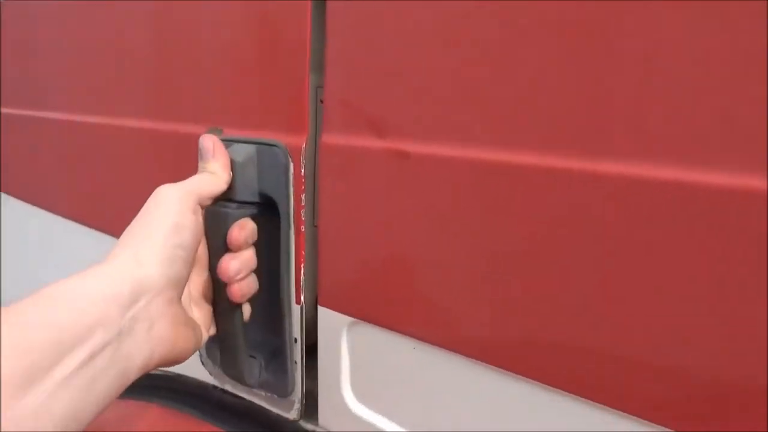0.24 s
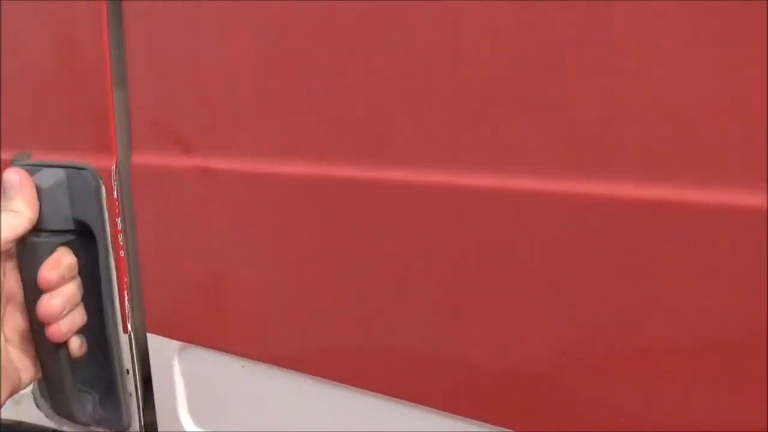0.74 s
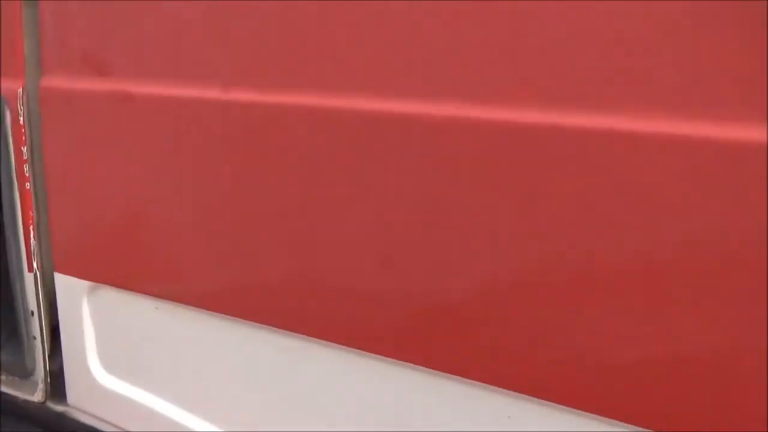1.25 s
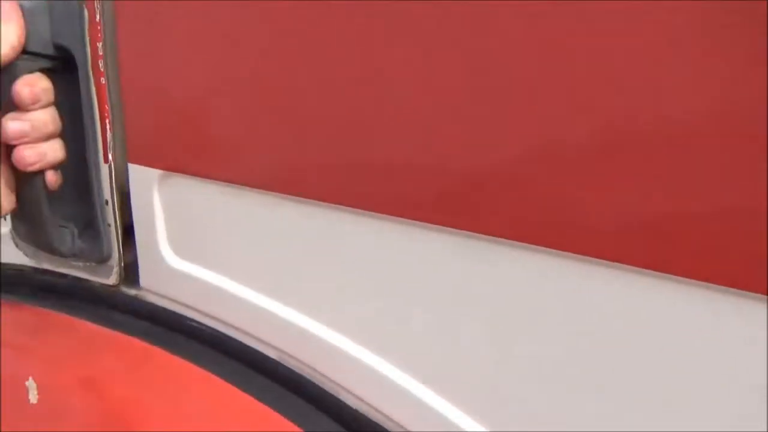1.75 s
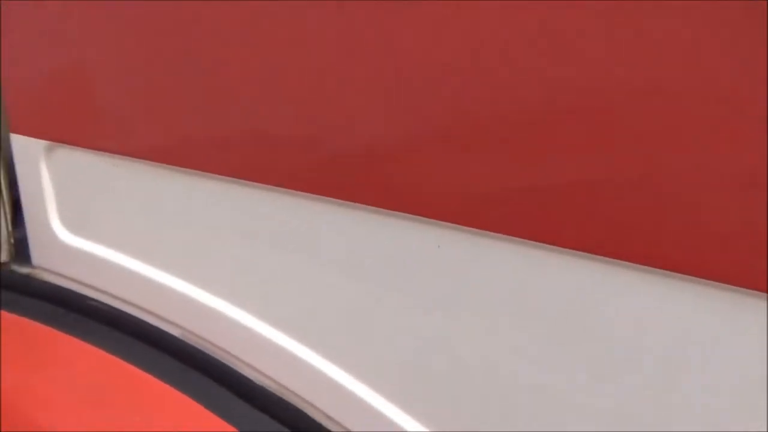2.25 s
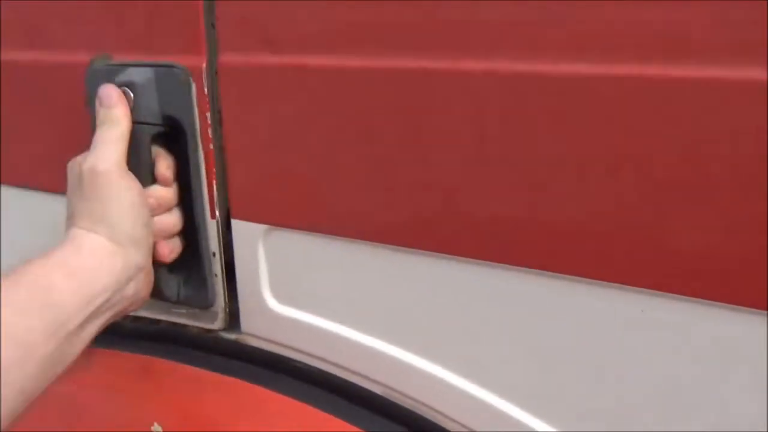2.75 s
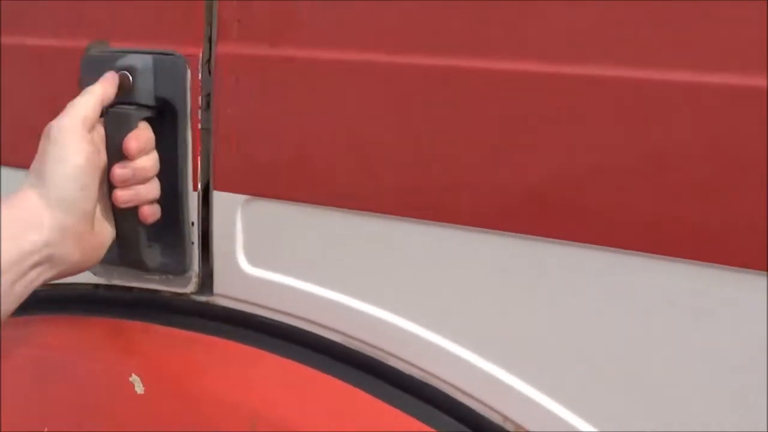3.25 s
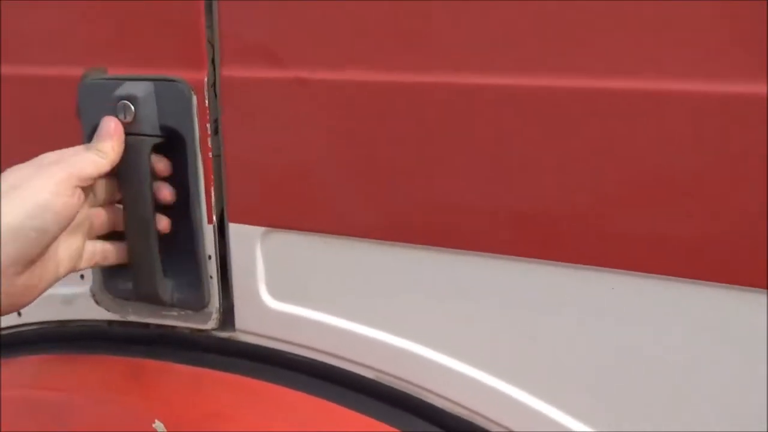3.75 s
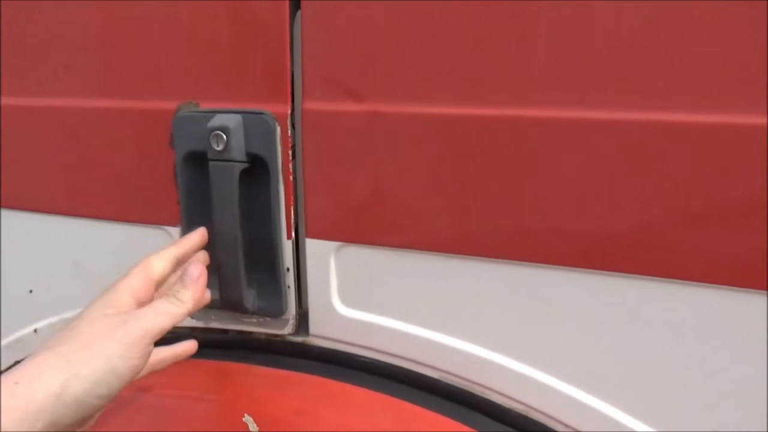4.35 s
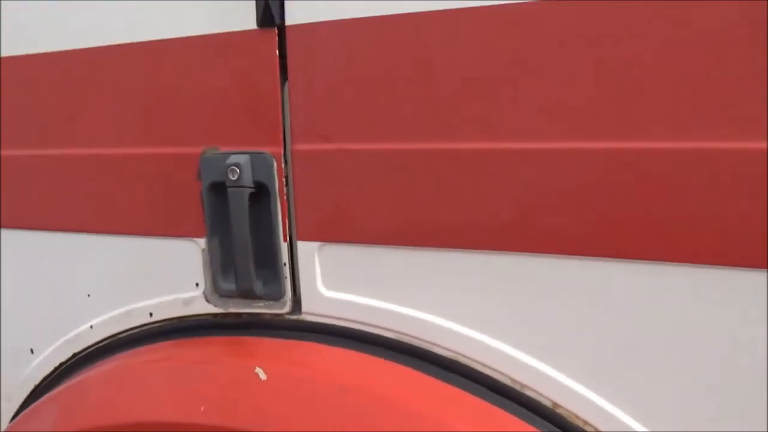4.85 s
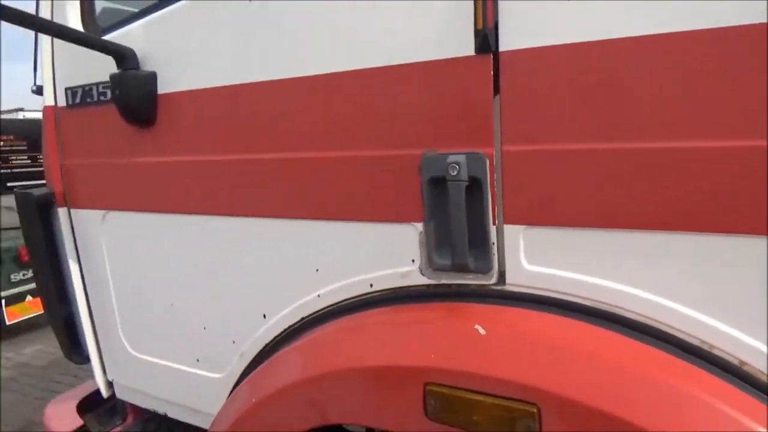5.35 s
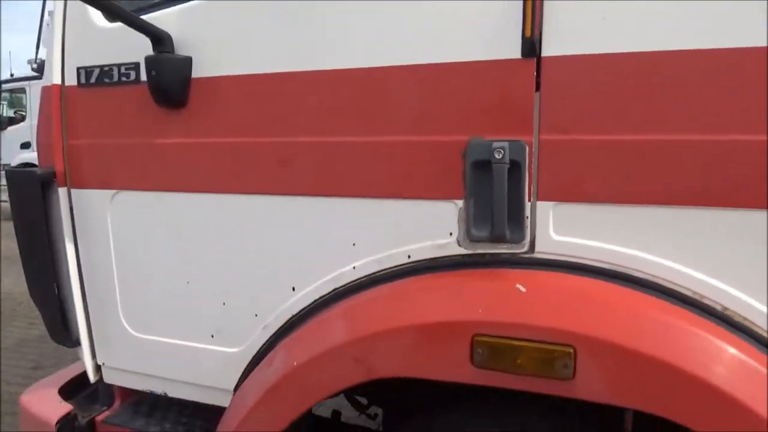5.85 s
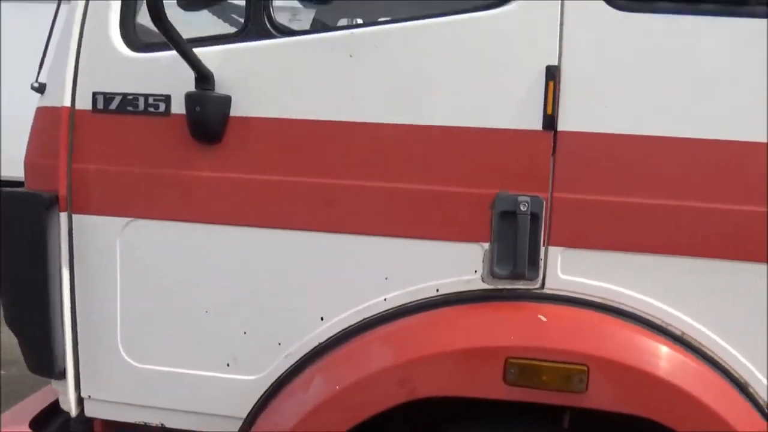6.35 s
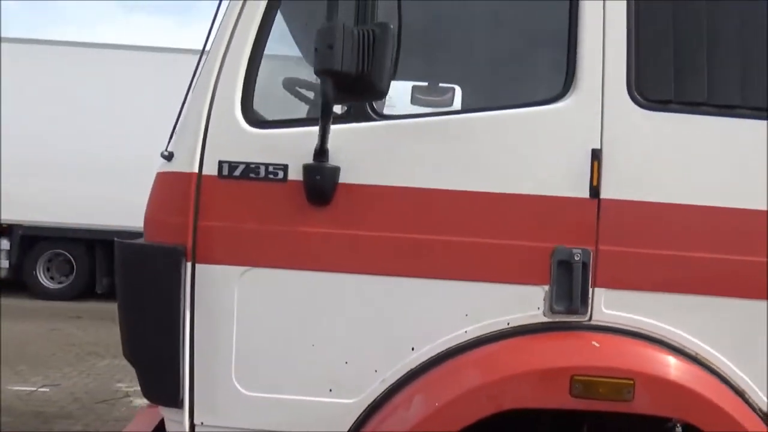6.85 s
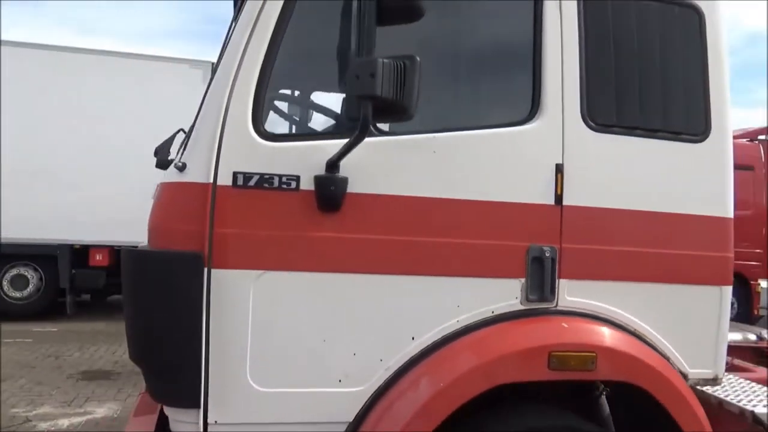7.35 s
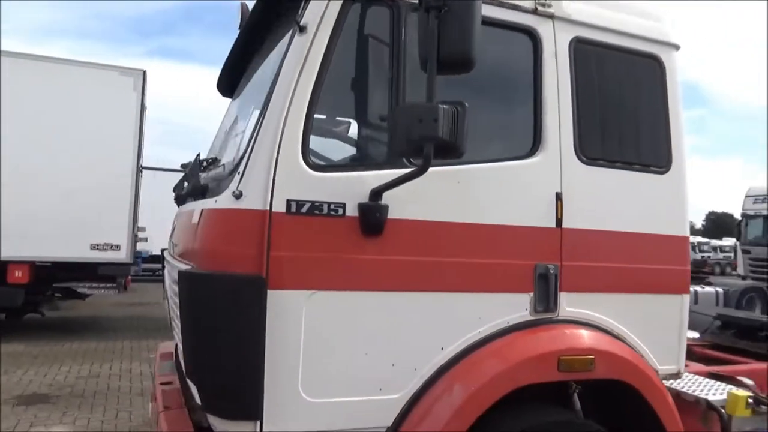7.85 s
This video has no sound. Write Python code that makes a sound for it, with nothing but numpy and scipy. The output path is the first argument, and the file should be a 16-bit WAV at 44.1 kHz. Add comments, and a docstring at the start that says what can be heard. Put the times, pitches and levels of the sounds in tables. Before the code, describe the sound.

Wind roars and thumps on a camera microphone while loose plastic clicks and a truck door handle clacks, over a low yard hum.

```python
"""A low, wavering howl and wind rumble over a far yard hum come first, then at once the rattle of loose plastic
near a hand-held camera as a hand tugs a plastic truck door handle. Wind is filtered noise and a modulated tone;
skin on plastic is grainy noise; contacts are noise bursts that ring a hollow shell, and tugs ring the door skin.
Gusts roar at the microphone ports as noise in quick eddies, and single pushes of air are short pressure pulses."""
import sys
import numpy as np
from scipy import signal
from scipy.fft import rfft, irfft, next_fast_len
from scipy.io import wavfile
from scipy.ndimage import uniform_filter1d, map_coordinates

SR = 44100
rng = np.random.default_rng(int(sys.argv[2]) if len(sys.argv) > 2 else 0)


def persist_wave(psi):
    """Save psi, clipped to +-1, as 16-bit WAV."""
    counts = np.round(np.clip(psi, -1, 1) * 32767).astype(np.int16)
    wavfile.write(sys.argv[1], SR, np.atleast_2d(counts).T)


N = 357651


def amp(db):
    """Level definition: decibels to amplitude gain."""
    return 10 ** (np.asarray(db) / 20)


def unit(x):
    """Normalisation: scaled to rms 1."""
    return x / np.sqrt(np.mean(x ** 2) + 1e-20)


def along(points, hz):
    """Spectral envelope: (f/Hz, level/dB) points joined on a log frequency axis, as gain."""
    f, level_db = np.transpose(points)
    return amp(np.interp(np.log(hz + 1), np.log(f + 1), level_db))


def curves(rows):
    """Linear interpolation: one value per sample for each column after t/s."""
    knots_s, *columns = np.transpose(rows)
    return [np.interp(np.arange(N) / SR, knots_s, column) for column in columns]


def wobble(rate):
    """Band-limited fluctuation: a smooth random curve with rate knots a second."""
    knots = rng.standard_normal(int(N * rate / SR) + 4)
    return map_coordinates(knots, [np.arange(N) * rate / SR])


def filtered(x, response):
    """Linear filtering: the spectrum of x times a response of frequency."""
    m = next_fast_len(N + 8192)
    return irfft(rfft(x, m) * response(np.fft.rfftfreq(m, 1 / SR)), m)[..., :N]


def pair(mid, side, side_db, pan_db=0):
    """Mid-side stereo: a shared part and an unshared part; positive pan favours the left."""
    side = amp(side_db) * side
    return np.array([(mid + side) * amp(pan_db / 2), (mid - side) * amp(-pan_db / 2)])


def rush(spectrum, lumps, side_db, pan_db=0):
    """Turbulent noise: modulated white noise, coloured, with mid and side each of rms 1 before the pair."""
    mid, side = filtered(lumps * rng.standard_normal((2, N)), lambda hz: along(spectrum, hz))
    return pair(unit(mid), unit(side), side_db, pan_db)


def steady(x, ms, share):
    """Envelope compression: evens out a share of a noise's own flutter, averaged over ms milliseconds."""
    power = np.abs(uniform_filter1d(np.mean(x ** 2, axis=0), size=round(ms * SR / 1000))) + 1e-3
    return unit(x / power ** (np.clip(share, 0, 1) / 2))


def ringing(modes, times, levels_db, tilts_db):
    """Modal synthesis: each blow rings the same damped modes with random strengths and slight detuning."""
    out, t = np.zeros(N + SR), np.arange(SR // 12) / SR
    hz, mode_db, t60 = np.transpose(modes)[:, :, None]
    chance = rng.standard_normal((len(times), 2, len(modes), 1))
    onset = 1 - np.exp(-t / 0.0013)
    for s, db, tilt_db, (size, detune) in zip(times, levels_db, tilts_db, chance):
        # the tilt is in dB per octave about the second mode
        level_db = db + mode_db + tilt_db * np.log2(hz / hz[1]) + 1.2 * size
        ring = amp(level_db - 60 * t / t60) * np.sin(2 * np.pi * hz * (1 + 0.046 * detune) * t)
        out[round(s * SR):][:len(t)] += ring.sum(axis=0) * onset
    return out[:N]


# wind on the diaphragm: (t/s, buffet level/dB)
WIND_LEVEL = [(0.0, -34), (0.11, -37), (0.27, -20), (0.34, -29), (0.38, -17.5), (0.65, -32), (1.44, -37),
              (1.58, -50), (2.01, -21.5), (2.12, -27.5), (2.14, -43.5), (2.94, -23), (3.03, -36),
              (3.09, -26.5), (3.7, -35), (3.95, -23), (4.04, -37), (5.56, -34), (5.96, -21), (6.78, -31),
              (6.86, -18), (6.89, -26.5), (6.96, -15), (7.07, -34.5), (7.97, -44), (8.11, -31)]
# buffet spectrum: (f/Hz, relative level/dB per Hz)
BUFFET_SPECTRUM = [(12, -37), (30, -15.5), (60, -7), (110, -5), (160, -10), (300, -16.5), (1000, -87)]
# air past the hollow: (t/s, howl level/dB)
HOWL_LEVEL = [(0.0, -31), (0.43, -16.5), (0.83, -34), (0.86, -27), (1.26, -38), (1.31, -25), (1.58, -39),
              (1.94, -29), (1.99, -16), (2.03, -30), (2.3, -23), (2.46, -36), (2.53, -20.5), (2.82, -25),
              (2.94, -18), (3.09, -36), (3.14, -26.5), (3.41, -26), (3.64, -15), (3.7, -29), (3.95, -24),
              (3.97, -32), (4.36, -14), (4.45, -35), (4.49, -15.5), (4.54, -32.5), (5.01, -25.5),
              (5.51, -41), (5.76, -27.5), (6.78, -33), (6.96, -23), (7.05, -32.5), (8.0, -40), (8.11, -28)]
# howl pitch, drifting with the wind speed: (t/s, centre f/Hz)
HOWL_PITCH = [(0, 185), (1.3, 194.8), (2.7, 190.3), (3.65, 182), (4.2, 159.7), (4.5, 185), (4.7, 160),
              (5.5, 171.6), (6, 157.5), (7, 172.1), (8.11, 178)]
# the camera turns: (t/s, howl left-right level/dB, traffic left-right level/dB)
CAMERA_TURN = [(0, 2.5, -2.5), (.81, -2, -1.5), (3.52, 0.5, -1), (4.22, 1.5, -4), (5.28, 1.5, -5.5),
               (5.56, 7.5, -6.5), (6.3, 6, -11.5), (6.8, 1, -10.5), (7.54, 7, -7), (8.11, 1, -4)]
LUMPS_DB, SWELLS_DB = 2.5, 1  # random swing of buffet and of howl
WANDER = 0.0799  # largest share by which the pitch wanders


def low_wind():
    """Vortex shedding: air past a hollow howls at an unsteady pitch; pressure lumps shake the diaphragm."""
    buffet_db = curves(WIND_LEVEL)[0] + LUMPS_DB * wobble(12)
    howl_db, howl_hz = curves(HOWL_LEVEL)[0], curves(HOWL_PITCH)[0]
    pan_db = curves(CAMERA_TURN)[0]
    buffet = amp(buffet_db) * steady(rush(BUFFET_SPECTRUM, 1, -21.5, 0.33 * pan_db), 72, 1.0)
    wandering_hz = howl_hz * (1 + WANDER * np.tanh(wobble(22)))
    carrier = np.exp(2j * np.pi * np.cumsum(wandering_hz) / SR)
    # random sidebands: a narrow band around the pitch
    sway = [np.tanh(wobble(50)) for _ in range(3)]
    mid = unit(np.real(carrier * (0.4 + sway[0] + 1j * sway[1])))
    side = unit(np.imag(carrier) * sway[2])
    howl = amp(howl_db + SWELLS_DB * wobble(12)) * pair(mid, side, -29.0, pan_db)
    return buffet + howl


# faint treble hiss of skin: (t/s, level/dB)
HISS_LEVEL = [(0.0, -47.5), (0.45, -54), (0.83, -47.5), (1.24, -54), (1.47, -54.5), (1.85, -51),
              (2.46, -54), (3.23, -50), (4.09, -57), (4.29, -58), (4.86, -50), (5.06, -58), (5.33, -56.5),
              (5.64, -49.5), (5.94, -53.5), (6.3, -49), (6.44, -54), (8.11, -56.5)]
# short strokes of skin or strap over plastic:
# (start t/s, treble level/dB, length/ms, middle level relative to treble/dB)
STROKES = [(.064, -24, 31.4, -0.5), (.278, -46.5, 88, 8.5), (.475, -40.5, 42, 10), (.6, -48, 32, 13),
           (.72, -43.5, 86, -1), (1.25, -47.5, 42, 18), (1.38, -45, 71, 1), (1.509, -35.5, 25, 6.5),
           (1.544, -40, 35, 11.5), (1.657, -41.5, 100, 8.5), (1.95, -41.5, 65, 5), (2.005, -38.5, 38, 11),
           (2.134, -33.5, 54, 1.5), (2.19, -39, 53, 11), (2.275, -46, 63, 6.5), (3.019, -25.5, 17, 7.5),
           (3.05, -33, 29, 4.5), (3.07, -42.5, 45, 12.5), (3.247, -44.5, 42.5, 3), (3.36, -47.5, 98, 10.5),
           (3.512, -45.5, 85, -4), (3.812, -46, 94, -2), (4.879, -48, 98, -8), (5.44, -49, 130, -17),
           (5.588, -45, 143, -7), (6.14, -46, 108, 6.5), (6.615, -43.5, 44, -5)]
# treble spectrum of rubbing: (f/Hz, relative level/dB per Hz)
SKIN_SPECTRUM = [(1500, -23), (3500, 5.5), (4700, 0.5), (7200, 6.5), (8500, 3.5), (11000, 1), (16000, -38)]
# middle spectrum of rubbing: (f/Hz, relative level/dB per Hz)
RASP_SPECTRUM = [(500, -26), (900, 1), (1500, 1), (2200, -1), (3500, -7), (6000, -21.5)]
STROKE_FADE_DB = -4  # over a stroke's length


def rubbing():
    """Stick-slip friction: a faint continuous hiss and grainy strokes that start at once and fade."""
    t = np.arange(SR // 3) / SR
    treble, middle = np.zeros((2, N + SR))
    for s, db, ms, middle_db in STROKES:
        done = t / (ms / 1000)  # share of the stroke's length
        fade_db = STROKE_FADE_DB * np.clip(done, 0, 1)
        release_db = 60 * np.maximum(done - 1, 0) * ms / 70  # 60 dB in 70 ms after the end
        stroke = np.clip(t / 0.0053, 0, 1) * amp(fade_db - release_db)
        span = slice(round(s * SR), round(s * SR) + len(t))
        treble[span] = np.maximum(treble[span], amp(db) * stroke)
        middle[span] = np.maximum(middle[span], amp(db + middle_db) * stroke)
    slips = amp(1.9 * wobble(350) + 1.1 * wobble(80))
    treble = np.maximum(treble[:N], amp(curves(HISS_LEVEL)[0]))
    return treble * rush(SKIN_SPECTRUM, slips, -10.0) + middle[:N] * rush(RASP_SPECTRUM, slips, -20)


# far traffic, louder away from the cab's shelter: (t/s, low drone level/dB, tyre hiss level/dB)
TRAFFIC_LEVEL = [(2.9, -33.5, -43.5), (3.24, -42, -38), (3.43, -35.5, -42), (4.5, -40.5, -40),
                 (5.7, -36, -40.5), (6.8, -31.5, -38.5), (7.9, -28, -37), (8.11, -24, -33.5)]
# lower drone spectrum: (f/Hz, relative level/dB per Hz)
LOW_DRONE_SPECTRUM = [(60, -41), (150, -9.5), (330, -2.5), (450, -8.5), (700, -11), (1200, -56)]
# higher drone spectrum: (f/Hz, relative level/dB per Hz)
HIGH_DRONE_SPECTRUM = [(60, -18), (150, -5), (380, -3), (490, 4), (620, -4.5), (1200, -56)]
# the drone's colour drifts as vehicles pass: (t/s, power share of the higher spectrum 0-1)
DRONE_DRIFT = [(0, 0), (5.5, 0.32), (5.9, 0.98), (6.8, 1), (7.15, 0.29), (7.7, 0.14), (8.11, 0.26)]
# tyre hiss spectrum: (f/Hz, relative level/dB per Hz)
TYRE_SPECTRUM = [(300, -58), (600, -5.5), (750, 1), (950, 1), (1300, -5.5), (2300, -13), (4500, -26),
                 (11000, -42), (16000, -44)]


def yard():
    """Incoherent summation: far traffic as two noise drones, crossfaded by power, and smooth tyre hiss."""
    drone_db, tyre_db = curves(TRAFFIC_LEVEL)
    pan_db = curves(CAMERA_TURN)[1]
    share = np.clip(curves(DRONE_DRIFT)[0], 0, 1)
    low = rush(LOW_DRONE_SPECTRUM, amp(0.99 * wobble(20)), -20.5, pan_db)
    high = rush(HIGH_DRONE_SPECTRUM, amp(0.99 * wobble(20)), -20.5, pan_db)
    drone = amp(drone_db) * (np.sqrt(1 - share) * low + np.sqrt(share) * high)
    tyres = amp(tyre_db) * rush(TYRE_SPECTRUM, amp(0.29 * wobble(41)), -14.0, 0.5 * pan_db)
    return drone + tyres


# plastic contacts: (t/s, treble level/dB before SNAP_DB, length/ms)
CONTACTS = [(.067, -48, 3.7), (.075, -14, 7.1), (.081, -69, 5.4), (.164, -26.5, 1.6), (.2387, -32, 2.5),
            (.2898, -26, 1.6), (.295, -25, 1.2), (.302, -25, 3.7), (.3351, -27, 4.2), (.494, -18, 3.4),
            (.5574, -23, 1.5), (.5629, -24.5, 6), (.6176, -14.5, 1.8), (.6324, -29, 6.4), (.685, -16.5, 3),
            (.7884, -35.5, 5), (.9375, -36.5, 2.5), (.9771, -29.5, 3.1), (1.0724, -22.5, 3.4),
            (1.0809, -40, 2.3), (1.2473, -25, 4.2), (1.2569, -14, 6.8), (1.3097, -35, 2.8),
            (1.3974, -30, 3.2), (1.404, -29, 4.7), (1.651, -22, 0.99), (1.662, -26, 1.9),
            (1.6762, -20, 4.2), (1.7055, -26.5, 4.6), (1.7421, -10, 0.83), (1.746, -10, 3.1),
            (1.7991, -19, 2.7), (1.8445, -21, 5.9), (1.8941, -27.5, 9.8), (1.9165, -33, 2.5),
            (1.9675, -30, 2.9), (1.9732, -12, 2.14), (1.982, -21, 2.3), (2.012, -30, 2.2),
            (2.022, -26, 7.4), (2.0416, -27, 1.64), (2.3097, -13.5, 2.2), (2.6157, -18, 3.5),
            (2.69, -39, 2.2), (2.7824, -14.5, 1.6), (2.8146, -31.5, 3), (2.968, -31, 2.3),
            (3.0199, -17.5, 5.3), (3.029, -24, 4.7), (3.0501, -8, 3.4), (3.057, -18, 4.1),
            (3.0915, -28, 2.3), (3.1056, -22, 4.3), (3.11, -21.5, 2), (3.1637, -24, 4), (3.171, -28, 2.4),
            (3.2176, -28, 2.2), (3.2257, -31, 2.5), (3.2641, -31, 2.4), (3.375, -32.5, 3.6),
            (3.3943, -28.5, 9.1), (3.45, -48, 2), (3.6128, -40, 4.2), (3.6267, -11.5, 1.8),
            (3.6776, -41, 3), (3.8483, -44, 4.9), (4.0037, -41.5, 2.6), (4.5705, -25, 1.1),
            (4.7346, -20.5, 2.6), (4.739, -15, 4.9), (4.755, -35, 2.5), (4.8208, -33, 3.2),
            (4.83, -26, 2.6), (4.9587, -29, 2.06), (5.039, -27.5, 1.4), (5.1582, -44, 2.7),
            (5.6528, -40, 2.8), (5.7526, -35, 3.1), (6.0512, -37, 1.6), (6.07, -33, 2.8),
            (6.1089, -24, 1.2), (6.2526, -24.5, 3.2), (6.319, -33, 1.96), (6.3246, -20.5, 3.6),
            (6.33, -23, 2.2), (6.3904, -31, 2.7), (6.3971, -24.5, 3.1), (6.4502, -40, 2.05),
            (6.516, -35, 2.9), (6.71, -36, 2.4), (6.7825, -25, 2.1), (6.79, -20.5, 1.77), (6.814, -34, 2.8),
            (6.8241, -28.5, 8.3), (6.835, -24, 3), (6.8537, -24, 1.63), (6.86, -30, 4.2), (6.9119, -31, 4),
            (6.9188, -30, 4.4), (6.9579, -38, 1.9), (7.0799, -35, 3.2), (7.0918, -33, 4.6),
            (7.1775, -25.5, 2.3), (7.383, -25, 2.7), (7.428, -35, 1.9), (7.4435, -29.5, 3.2),
            (7.4935, -30, 3.7), (7.5001, -21, 1.65), (7.5523, -28, 1.95), (7.5617, -30, 3.2),
            (7.6221, -27, 3.7), (7.6671, -40, 2.1), (7.88, -41, 2.6)]
# treble of a contact: (f/Hz, gain/dB)
SNAP_RESPONSE = [(2500, -65), (4200, -13.5), (5500, 0), (7000, 2.5), (8500, -2), (10000, -1), (16000, -3)]
# duller part of a contact: (f/Hz, gain/dB)
BODY_RESPONSE = [(700, -37), (1500, -3.5), (2000, -2.5), (3000, -1.5), (4000, -2.5), (6000, -17)]
# modes of the hollow plastic: (f/Hz before detuning, relative level/dB, t60/s)
SHELL_MODES = [(886.6, -1, 0.063), (996, 10.5, 0.015), (1760, 15, 0.0041)]
USUAL_DB = -26  # treble level of a usual contact
SNAP_DB, BODY_DB, KNOCK_DB = 5.5, 9.5, -1.5  # final gains of the three parts
BODY_GROWS, KNOCK_GROWS = 0.45, 0.17  # dB per dB of treble: harder contacts are brighter
SCATTER_DB = 1  # random spread of body and knock
KNOCK_LONG_DB = 5  # more knock for each doubling of a contact's length
DULLEST_DB = 6.5  # body and knock stay within this over the treble, before the final gains
CHATTER, CHATTER_DB, CHATTER_MS = 20, -46, 2.5  # faint random contacts: count, highest level, length


def rattle():
    """Impact excitation: each contact is a burst of a few milliseconds that knocks the hollow shell."""
    luck = rng.random((CHATTER, 2))
    faint_s = .1 + luck[:, 0] * (N / SR - .2)
    faint = np.c_[faint_s, CHATTER_DB - 6 * luck[:, 1], np.full(CHATTER, CHATTER_MS)]
    s, db, ms = np.vstack([CONTACTS, faint]).T[:, :, None]
    scatter_db = SCATTER_DB * rng.standard_normal((len(s), 2, 1))
    hardness_db = db - USUAL_DB
    body_db = USUAL_DB + BODY_GROWS * hardness_db + scatter_db[:, 0]
    knock_db = USUAL_DB + KNOCK_GROWS * hardness_db + scatter_db[:, 1]
    knock_db = knock_db + KNOCK_LONG_DB * np.log2(ms / CHATTER_MS)
    body_db, knock_db = np.minimum([body_db, knock_db], db + DULLEST_DB)

    offsets = np.arange(-400, 900)
    t = offsets / SR
    rise = 1 / (1 + (t / (.00035 * ms)) ** 2) ** 1.4
    shape = np.where(t < 0, rise, np.exp(-t / (.0005 * ms)))
    noise = rng.standard_normal((len(s), 4, len(t))) * shape[:, None]
    # every burst gets the energy of its envelope
    shape_energy = (shape ** 2).sum(axis=1)[:, None, None]
    noise /= np.sqrt((noise ** 2).sum(axis=2, keepdims=True) / shape_energy)
    at = (np.round(s * SR).astype(int) + offsets).ravel()

    def train(k, level_db):
        """Superposition: the bursts of noise k summed at their times."""
        return np.bincount(at, (noise[:, k] * amp(level_db)).ravel(), N + SR)[:N]

    snap = filtered(pair(train(0, db), train(1, db), -11.0), lambda hz: along(SNAP_RESPONSE, hz))
    body = pair(train(2, body_db), train(3, body_db), -11.5)
    body = filtered(body, lambda hz: along(BODY_RESPONSE, hz))
    body = np.roll(body, 60, axis=1)  # samples; the duller part follows the snap
    knock = ringing(SHELL_MODES, s[:, 0] - .0025, knock_db[:, 0], np.zeros(len(s)))
    knock = knock * amp([[-.6], [.6]])  # a little to the right
    return amp(SNAP_DB) * snap + amp(BODY_DB) * body + amp(KNOCK_DB) * knock


# the handle strikes its stop: (t/s, level/dB, brightness/dB per octave)
HANDLE_STRIKES = [(0.067, -20.5, 4), (0.076, -14, 3), (1.676, -28, -2), (1.689, -20, -6),
                  (3.0185, -20, 11.5), (3.023, -15, -9), (3.035, -18, 7), (3.054, -14.5, -6)]
# modes of the door skin: (f/Hz before detuning, relative level/dB, t60/s)
DOOR_MODES = [(665, 6, 0.034), (788, 4.5, 0.077), (1440, -8, 0.066), (1960, -5, 0.021), (2276, -22, 0.04),
              (2450, -42, 0.01)]


def handle():
    """Modal response of a plate: the handle's stop rings the door skin."""
    s, db, tilt_db = np.transpose(HANDLE_STRIKES)
    return ringing(DOOR_MODES, s, db, tilt_db) * amp([[-.7], [.7]])


def nearby(x):
    """Diffuse reflection: the cab side and the paving send back a short, decaying answer."""
    t = np.arange(SR // 8) / SR
    tail = rng.standard_normal((2, len(t))) * amp(-60 * t / 0.095)
    return signal.fftconvolve(x, tail / np.linalg.norm(tail[0]), axes=1)[:, :N]


# gusts at the ports, one list for each gust: (t/s, roar level/dB before the eddies)
GUST_LEVELS = [
    [(.2, -40), (.36, -34), (.45, -19), (.77, -25), (1.0, -18), (1.165, -24), (1.3, -20), (1.49, -27),
     (1.56, -45)],
    [(1.62, -59), (1.69, -39), (1.79, -37), (1.86, -67), (1.94, -29), (2.03, -23), (2.1, -48), (2.24, -39),
     (2.35, -52)],
    [(2.8, -56), (2.93, -27.5), (3.0, -41), (3.03, -21.5), (3.15, -35), (3.24, -36), (3.33, -33),
     (3.5, -47)],
    [(5.64, -44), (5.7, -36), (5.83, -34), (6.09, -40), (6.42, -35), (6.74, -44), (6.9, -35), (7.1, -50)],
]
# the hardest eddies: (start t/s, length/ms, level/dB before the flutter, upper edge relative level/dB)
HARD_EDDIES = [(0.182, 10, -30, 5), (.243, 29, -26, -2), (0.377, 85, -15, -28), (.485, 130, -12.5, -13),
               (0.637, 23, -12.5, -15), (.674, 13, -14, -14), (.71, 41, -16, -7), (0.81, 18, -10.5, -8.5),
               (0.861, 35, -14, -8), (.905, 38, -15.5, -11.5), (.982, 62, -13, -9),
               (1.056, 6.1, -11, -10.5), (1.087, 32, -12, -10.5), (1.187, 26, -14, -5),
               (1.236, 86, -15, -8), (1.333, 16, -11, -10), (1.359, 14, -13.5, -4.5),
               (1.399, 27, -16.5, -4.5), (1.431, 23, -18, -7), (1.525, 11.5, -20.5, -18),
               (3.186, 19, -29, -27), (3.292, 22, -28, -9), (6.935, 29, -25.5, -22)]
# body of the roar: (f/Hz, relative level/dB per Hz)
GUST_SPECTRUM = [(60, -28), (200, -4.5), (300, 0.5), (500, -2), (700, -9), (1100, -26), (3000, -98)]
# upper edge of the roar: (f/Hz, relative level/dB per Hz)
EDGE_SPECTRUM = [(300, -43), (650, 3), (900, 0.5), (1300, -5), (2000, -13), (3500, -28), (5000, -42),
                 (12000, -92)]
EDGE_DB = -11.5  # the roar's upper edge under its body, outside the hardest eddies
PUFF_RISE_S, PUFF_FALL_S = 0.0032, 0.004


def roar():
    """Turbulent pressure: gusts burst at the ports in quick eddies of bounded size, with an upper edge."""
    t = np.arange(N) / SR
    blowing = np.any([(t >= gust[0][0]) & (t < gust[-1][0]) for gust in GUST_LEVELS], axis=0)
    level = amp(curves(np.concatenate(GUST_LEVELS))[0]) * blowing
    level = uniform_filter1d(level, size=441)
    edge_level = level * amp(EDGE_DB)
    for s, ms, db, edge_db in HARD_EDDIES:
        late = np.maximum(t - s - ms / 1000, 0)  # seconds past the eddy's end
        puff = amp(db) * np.clip((t - s) / PUFF_RISE_S, 0, 1) * np.exp(-late / PUFF_FALL_S)
        level = np.maximum(level, puff)
        edge_level = np.maximum(edge_level, puff * amp(edge_db))
    eddy = np.tanh(1.1 * wobble(45) + .8 * wobble(200))
    # the edge swings further than the body
    body = steady(rush(GUST_SPECTRUM, 1, -22, -1.2), 14, .7) * amp(2.5 * eddy)
    edge = steady(rush(EDGE_SPECTRUM, 1, -17, -1.2), 8, .6) * amp(5.5 * eddy)
    return level * body + edge_level * edge


# single pushes of air on the diaphragm: (t/s, level/dB, pitch f/Hz)
AIR_PUSHES = [(0.244, -3.5, 173), (0.263, -12, 204), (1.526, -11.5, 267), (1.984, -3, 196),
              (2.011, -20, 121), (2.051, -10, 226.5), (2.922, -1, 228), (2.959, -10.5, 227),
              (2.993, -7, 175), (3.125, -16, 205), (3.14, -13, 205), (3.185, -7.5, 197), (3.29, -10, 284),
              (3.303, -14.5, 150), (6.849, -12, 120), (6.948, -5, 178)]


def thumps():
    """Pressure pulse: each push is little more than one swing under a Gaussian envelope."""
    out, t = np.zeros(N + SR), np.arange(-800, 1600) / SR
    for s, db, hz in AIR_PUSHES:
        cycles = t * hz - .6
        swing = np.exp(-(cycles / .55) ** 2) * np.sin(2 * np.pi * cycles + .7)
        out[round(s * SR) - 800:][:len(t)] += amp(db) * swing
    return out[:N] * amp([[0], [.3]])


def scene():
    """Superposition: all sources add at the two ports."""
    plastic = rattle() + handle()
    answer = amp(-15) * nearby(plastic)
    return plastic + answer + low_wind() + roar() + thumps() + rubbing() + yard()


# overall treble limit, a steep fall above 11 kHz: (f/Hz, gain/dB)
TOP_RESPONSE = [(20, 0.5), (10950, -1.5), (11200, -16), (11600, -23.5), (12300, -46)]
TOP_HZ = 12349  # nothing passes from here up


def record(dry):
    """Saturation and band limiting: loud peaks clip softly, then the treble falls steeply up to the limit."""
    soft = dry / (1 + np.abs(dry / .9) ** 4) ** (1 / 4)
    return filtered(soft, lambda hz: along(TOP_RESPONSE, hz) * (hz < TOP_HZ))


dry = scene()
out = record(dry)
persist_wave(out)
```